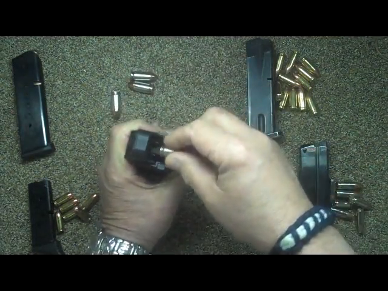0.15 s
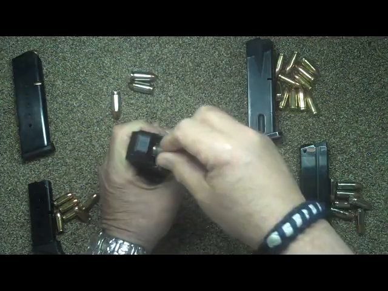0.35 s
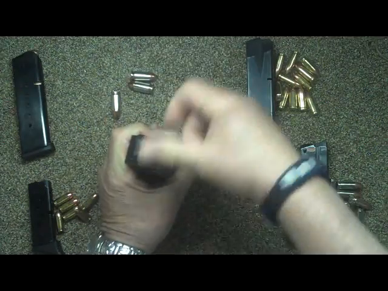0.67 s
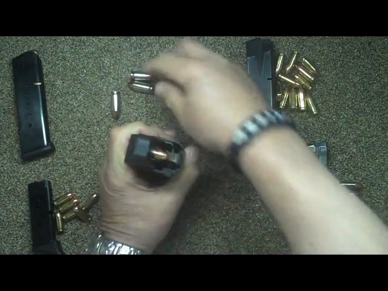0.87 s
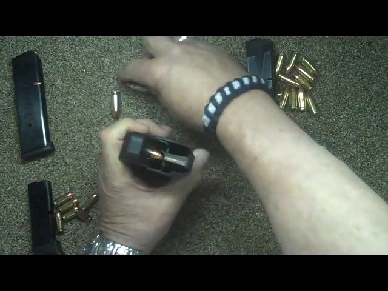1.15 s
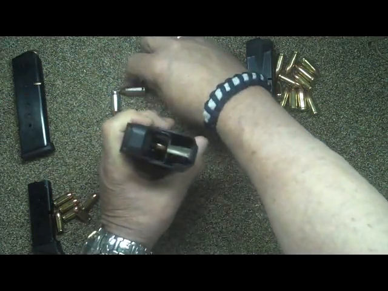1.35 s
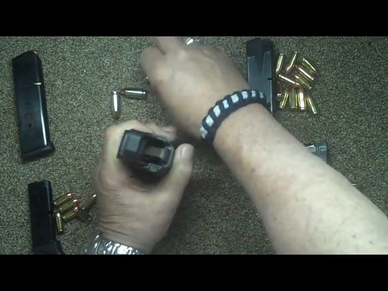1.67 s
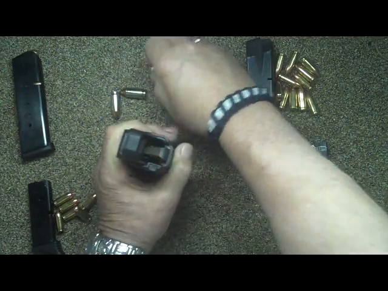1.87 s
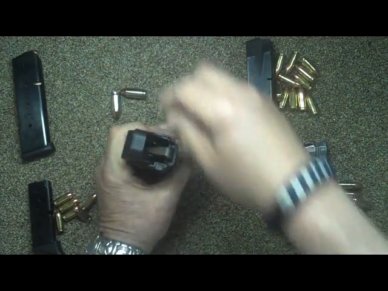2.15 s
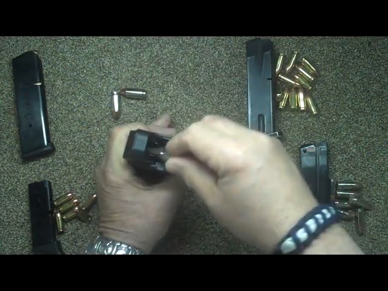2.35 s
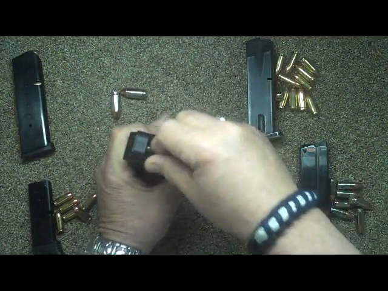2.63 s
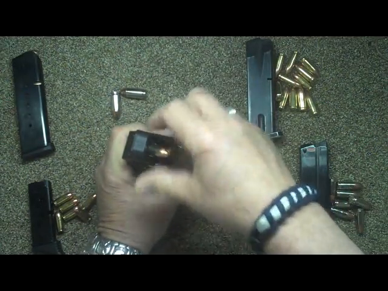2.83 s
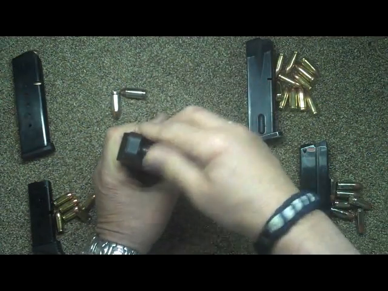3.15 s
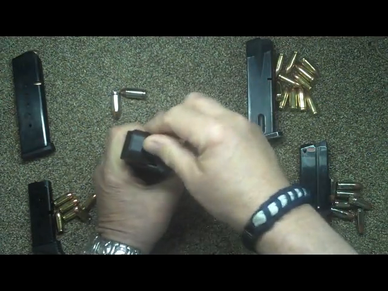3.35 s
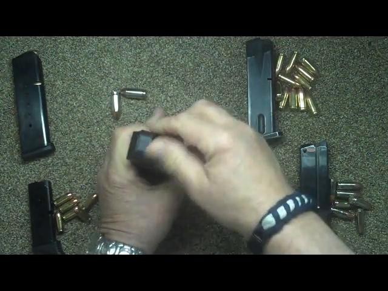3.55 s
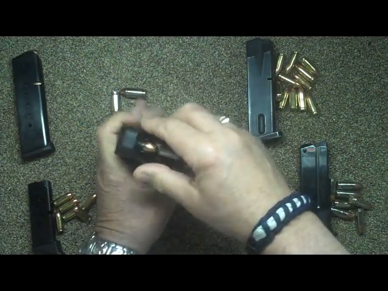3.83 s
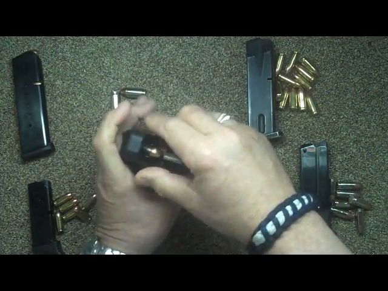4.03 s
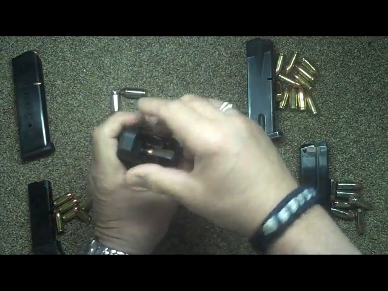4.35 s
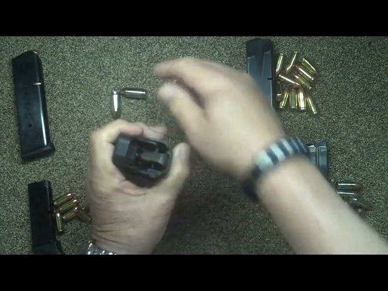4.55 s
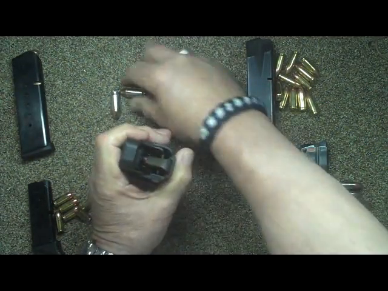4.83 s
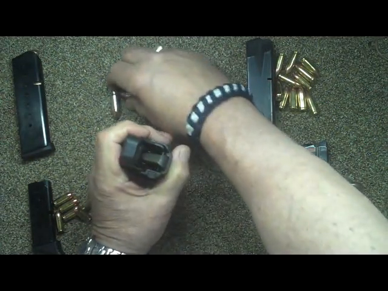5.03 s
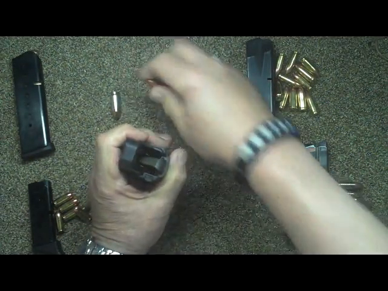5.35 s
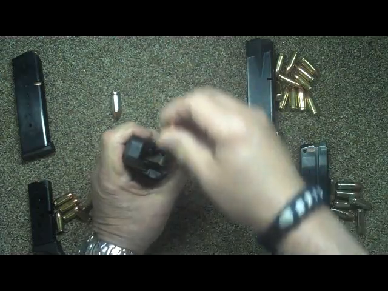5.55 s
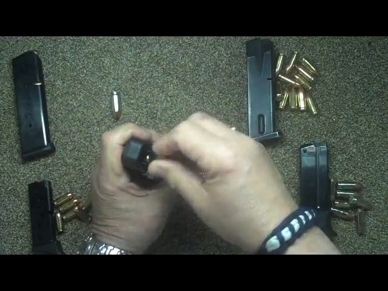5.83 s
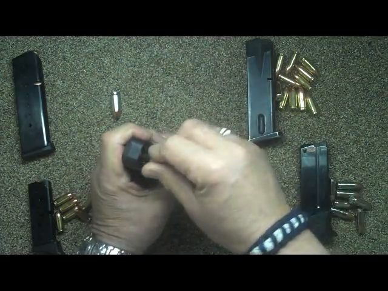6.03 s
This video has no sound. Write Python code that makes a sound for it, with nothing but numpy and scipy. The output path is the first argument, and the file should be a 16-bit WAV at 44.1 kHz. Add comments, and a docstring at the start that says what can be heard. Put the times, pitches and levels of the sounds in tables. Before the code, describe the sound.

Hands press cartridges one by one into a pistol magazine at a carpeted table. Sharp, dry clicks of plastic, steel and brass come in irregular clusters, with short gritty scrapes and faint finger rubbing between them. A scraping start leads to hard snaps, a busy middle burst, quieter handling, then more strong clicks. Close microphone, small soft room, steady low hiss.

```python
"""Sharp plastic and metal snaps, scrapes and soft rubbing, over steady hiss: hands press cartridges into
a pistol magazine with a plastic loader standing on a carpeted table, close to a microphone in a small room.
Each snap is a short chatter of tiny impacts that rings the base, loader, steel tube and brass.
Rubbing, scrapes and slides are gritty slips on the same parts; the spring is a dying sine.
Sparse echoes make the room and shaped noise makes the hiss."""
import sys
import numpy as np
from scipy import signal
from scipy.fft import rfft, irfft
from scipy.io import wavfile
from scipy.ndimage import uniform_filter1d

SR = 44100
rng = np.random.default_rng(int(sys.argv[2]) if len(sys.argv) > 2 else 0)


def master(y):
    """Save y as 16-bit WAV."""
    cut = np.clip(np.atleast_2d(y).T, -1, 1)
    pcm = np.round(cut * 32767)  # scale
    wavfile.write(sys.argv[1], SR, pcm.astype(np.int16))


N = 272979

# bounds between base, loader, tube and brass: f/Hz
PART_EDGES_HZ = [1400, 2600, 5500]
# dry rasp of skin and plastic between the rings: f/Hz, relative level per Hz/dB
RASP_SPECTRUM = [(100, 1.5), (400, -47.5), (1300, -5), (1800, 0), (3300, 4.5), (4000, -6), (5700, -1),
                 (8000, -4.5), (13500, -12)]
RASP_LUMP_DB = 2.5  # unevenness of the rasp
ANSWER_SIZE = 4096  # samples in the answer to one impact


def gain_of(db):
    """Decibels to gain."""
    return 10 ** (np.asarray(db) / 20)


def evened(x):
    """Scales each row to rms 1."""
    return x / np.sqrt(np.mean(x ** 2, -1, keepdims=True) + 1e-20)


def read(points, hz):
    """Reads a spectrum on a log-frequency axis."""
    f, value = np.transpose(points)
    return np.interp(np.log(hz + 1), np.log(f + 1), value)


def add(mix, s, sound):
    """Mixes a sound in at a time."""
    part = mix[round(s * SR):][:len(sound)]
    part += sound[:len(part)]


def coloured(x, points):
    """Shapes a signal by a spectrum."""
    hz = np.fft.rfftfreq(len(x), 1 / SR)
    return irfft(rfft(x) * gain_of(read(points, hz)), len(x))


def wander(size):
    """Slow random curve of rms 1: noise smoothed twice over size samples."""
    once = uniform_filter1d(rng.standard_normal(N), size)
    return evened(uniform_filter1d(once, size))


def grit(size, per_s, spread_db):
    """Tiny impacts at random times, of random sign and uneven size."""
    sizes = gain_of(spread_db * np.minimum(rng.exponential(1, size), 4))
    signs = rng.choice([-1., 1.], size)
    struck = rng.random(size) < per_s / SR
    return evened(sizes * signs * struck)


def knocks(colour, lump_db, size=ANSWER_SIZE):
    """Causal dry answer of each part: its share of a lumpy spectrum, with minimum phase."""
    hz = abs(np.fft.fftfreq(size, 1 / SR))
    inside = np.digitize(hz, PART_EDGES_HZ) == np.arange(4)[:, None]
    # many small, short rings above the base
    lumps = np.interp(hz, np.linspace(0, SR / 2, 160), rng.standard_normal(160))
    lumps_db = lump_db * (hz > PART_EDGES_HZ[0]) * lumps
    share = uniform_filter1d(inside * 1., size=60, mode="wrap") + 0.00054
    log_gain = np.log(gain_of(read(colour, hz) + lumps_db) * share)
    minimum_phase = np.exp(np.conj(signal.hilbert(log_gain)))
    return evened(np.fft.ifft(minimum_phase).real)


def parts(colour, dry_db, lump_db, spot_hz=2900.0, spot_db=-46.0, grip=0.0082, size=ANSWER_SIZE):
    """Answer of base, loader, tube and brass to one impact; the spot struck wakes the ring nearest spot_hz."""
    # what the parts ring with: f/Hz, width without the grip/Hz, level before scatter/dB
    ring_modes = [(300, 70, -9), (510, 50, -7), (590, 45, -2), (1075, 25, -11), (1200, 30, -12),
                  (1634, 30, -7), (1880, 32, -5), (2060, 38, -2), (2270, 50, -8), (2455, 35, -8),
                  (2740, 80, -8), (2950, 40, -9), (3130, 55, 0), (3290, 50, -5), (3700, 70, -8),
                  (4570, 40, -7), (4740, 40, -1), (5000, 90, -5), (5330, 70, -9), (5950, 80, -10),
                  (6770, 90, -9), (7160, 150, -10), (9140, 300, -18)]
    t = np.arange(size) / SR
    hz, width_hz, db = np.transpose(ring_modes)[..., None]
    width_hz = width_hz + grip * hz  # the gripping hand damps every ring, the high ones most
    scatter_db = 4 * rng.standard_normal(hz.shape)  # no two spots are alike
    rings = evened(np.exp(-np.pi * width_hz * t) * np.sin(2 * np.pi * hz * t))
    inside = np.digitize(hz[:, 0], PART_EDGES_HZ) == np.arange(4)[:, None]
    ringing = evened(inside @ (gain_of(db + scatter_db) * rings))
    dry = gain_of(dry_db - np.array([[8], [0], [0], [0]]))  # the hollow base rings more than it knocks
    woken = np.argmin(abs(hz - spot_hz))
    favoured = gain_of(spot_db) * inside[:, [woken]] * rings[woken]
    answer = ringing + dry * knocks(colour, lump_db) + favoured
    # only the base has a low voice
    high_pass = signal.butter(3, PART_EDGES_HZ[0], "high", fs=SR, output="sos")
    small = signal.sosfilt(high_pass, answer[1:])
    return evened(np.vstack([answer[:1], small]))


def shares(level_db, base_db, bright_db, spot_hz):
    """Gains of base, loader, tube and brass; brightness moves the sound from the loader to the brass."""
    tube_db, woken_db = 3.5, 4.5  # lift of the steel tube; lift of the part that holds the favoured ring
    woken = np.digitize(spot_hz, PART_EDGES_HZ) == np.arange(4)
    return gain_of(level_db + np.array([base_db, -bright_db, tube_db, bright_db]) + woken_db * woken)


def rubbing():
    """Dense slips under the moving hands ring the same parts; the contact drifts between four spots."""
    # light rubbing of the fingers: t/s, level before part shares/dB
    rub_levels = [(0, -37.5), (.22, -73.5), (.56, -52), (.72, -66), (1., -57), (1.38, -59.5), (1.55, -60.5),
                  (1.93, -65), (2.248, -52), (2.42, -63), (2.78, -58), (3.1, -63), (3.9, -58.5),
                  (4.24, -59.5), (4.37, -49.5), (4.52, -67), (4.95, -59.5), (5.5, -65), (5.702, -68),
                  (5.85, -58.5), (6.19, -56)]
    # base, loader, tube, brass: share/dB
    rub_shares_db = [-25, -9.5, -7, -11.5]
    dry_db = 14  # rasp over the rings
    weights = gain_of(np.interp(np.arange(N) / SR, *np.transpose(rub_levels)) + np.c_[rub_shares_db])
    drifts = gain_of([3.5 * wander(size=2500) for _ in range(4)])
    out = np.zeros(N)
    for drift in drifts / np.linalg.norm(drifts, axis=0):
        slips = np.array([grit(size=N, per_s=9000., spread_db=-3.0) * gain_of(4.8 * wander(size=1200))
                          for _ in weights])
        slips *= gain_of(1.75 * wander(size=400)) * drift  # flutter common to the parts
        answer = parts(RASP_SPECTRUM, dry_db, RASP_LUMP_DB)
        out += signal.oaconvolve(weights * slips, answer, axes=1)[:, :N].sum(0)
    return out / np.sqrt(ANSWER_SIZE)  # answers to unit energy


def scrape(length_s, level_db, base_db, bright_db, spot_hz, spot_db):
    """Gritty slips of part on part that bite, hold and let go."""
    attack_s, dry_db = 0.0056, 4  # dry: rasp over the rings
    release_db = 30  # lost in each further length of the scrape
    t = np.arange(16384) / SR
    overrun = np.maximum(t / max(length_s, .002) - 1, 0)
    hold = np.minimum(t / attack_s, 1) * gain_of(-release_db * overrun)
    flutter = gain_of(1.8 * wander(size=300)[:len(t)])
    slips = hold * grit(size=len(t), per_s=3000., spread_db=4.) * flutter
    impact = parts(RASP_SPECTRUM, dry_db, RASP_LUMP_DB, spot_hz, spot_db, grip=.018)
    answer = signal.fftconvolve(impact, slips[None], axes=1)
    return shares(level_db, base_db, bright_db, spot_hz) @ answer / np.sqrt(ANSWER_SIZE)


def hiss():
    """Steady microphone and room hiss: Gaussian noise shaped by a spectrum."""
    # f/Hz, relative level per Hz/dB
    hiss_spectrum = [(20, 12), (60, 9.5), (150, 5), (300, 3.5), (800, 2.5), (1500, -4), (3000, -22.5),
                     (5000, -30), (8000, -24), (14000, -18)]
    level_db = -69.5  # rms
    return gain_of(level_db) * evened(coloured(rng.standard_normal(N), hiss_spectrum))


def snap(strength_db, base_db, bright_db, spot_hz, length_s, drag):
    """A chatter of impacts rings all four parts: a clean blow decays at once, a dragged one swells, holds and breaks off."""
    # dry knock between the rings: f/Hz, relative level per Hz/dB
    knock_spectrum = [(60, -68), (150, -25), (400, 14.5), (900, 8.5), (1300, 4), (1800, 31), (3000, 33),
                      (5000, 24.5), (7500, 10), (10000, -1), (13500, -62)]
    dry_db, lump_db, spot_db = 6, 3, 5  # knock over rings; its unevenness; favoured ring over the others
    lead_db = 3.5  # first impact of a clean blow, against the chatter
    t = np.arange(4096) / SR
    length_s, drag = max(length_s, .001), max(drag, .7)
    swell_s = 0.0018 + 0.0021 * length_s * drag ** 2
    blow = (1 - np.exp(-t / swell_s)) * np.exp(-(t / length_s) ** drag)
    chatter = blow * grit(size=len(t), per_s=9900.0, spread_db=2.5)
    chatter[20] += gain_of(lead_db) / drag ** 2
    impact = parts(knock_spectrum, dry_db, lump_db, spot_hz, spot_db, grip=.019)
    answer = signal.fftconvolve(impact, chatter[None], axes=1)
    # loudest 200 samples of each part to rms 1
    answer /= np.sqrt(abs(uniform_filter1d(answer ** 2, 200))).max(1, keepdims=True)
    return shares(strength_db, base_db, bright_db, spot_hz) @ answer


def spring(level_db):
    """The magazine spring hums on after a jolt: a thin dying sine, cut at 0.5 s."""
    hum_hz, t60_s = 520, .55
    t = np.arange(SR // 2) / SR
    return gain_of(level_db - 60 * t / t60_s) * np.sin(2 * np.pi * hum_hz * t)


def slide(path):
    """Slips pass a travelling band, which wakes one ring after another; returns start/s and sound."""
    contact_width_hz = 200.  # how many rings the contact reaches at once
    s, db, hz = np.transpose(path)
    t = np.arange(s[0], s[-1], 1 / SR)
    slips = grit(size=len(t), per_s=13000.0, spread_db=-0.5)
    # band-pass: shifted down to zero, smoothed, shifted back
    turn = np.exp(2j * np.pi * np.cumsum(np.interp(t, s, hz)) / SR)
    keep = np.exp(-np.pi * contact_width_hz / SR)
    contact = turn * signal.lfilter([1], [1, -2 * keep, keep ** 2], slips / turn)
    impact = parts(RASP_SPECTRUM, -15.0, RASP_LUMP_DB, grip=.006).sum(0)
    ringing = signal.fftconvolve(contact.real, impact)[:len(t)]
    local_rms = np.sqrt(uniform_filter1d(ringing ** 2, size=1500) + 1e-20)
    return s[0], gain_of(np.interp(t, s, db)) * ringing / local_rms


def room(x):
    """Sparse echoes of random sign that die quickly in a soft room."""
    t60_s = 0.085
    at = np.arange(150, 9000, 20)
    taps = np.zeros(9100)
    signs = rng.choice([-1., 1.], len(at))
    taps[at + rng.integers(0, 20, len(at))] = signs * gain_of(-60 * at / SR / t60_s)
    taps = signal.lfilter([1], [1, -.4], taps)  # gently softer treble
    return signal.oaconvolve(x, taps / np.linalg.norm(taps))[:N]


def scene():
    """Rubbing, scrapes, snaps, spring and slides in the room, over the hiss."""
    # part on part: start/s, length/s, level before part shares/dB, base share/dB, brightness/dB,
    # favoured ring f/Hz, its level over the other rings/dB
    scrape_events = [(0, 0.12, -52.5, 0.5, -4, 3130, 18), (0.025, 0.028, -49, -6.5, 1.5, 590, 28),
                     (0.085, 0.014, -49, -6, 2, 525, 20), (0.418, 0.056, -75.5, -14, 11, 7160, 0),
                     (0.66, 0.014, -65.5, 2, 3, 2060, 12), (0.778, 0.019, -66.5, 5, -5, 1634, 12),
                     (0.838, 0.055, -62.5, 0.5, -2, 1634, 6), (0.912, 0.091, -60.5, -24, -2, 1634, -4),
                     (1.273, 0.024, -46.5, -9, -5.5, 2060, 13), (1.599, 0.084, -57, -11.5, 1, 2060, -5),
                     (1.994, 0.065, -54.5, 3, -0.5, 3130, 9), (2.084, 0.042, -58.5, 5.5, -8.5, 525, 22),
                     (2.105, 0.079, -63, 7, -2, 2060, 12), (2.194, 0.056, -64, 5, -6, 1634, 24),
                     (2.664, 0.034, -56, -7, 1, 1880, 11), (2.918, 0.0108, -53, -20, -17, 1634, 25),
                     (3.032, 0.0087, -64, -20, -11.5, 1634, 21), (3.064, 0.011, -77.5, -20, 14.5, 9140, 6),
                     (3.329, 0.063, -62.5, 5, -0.5, 1634, 4), (3.519, 0.029, -64, -3.5, -2.5, 2060, -4),
                     (3.609, 0.042, -73, -2, 11.5, 3130, 14), (3.694, 0.018, -72, 11, -8, 2060, -4),
                     (3.802, 0.038, -51.5, -33, 0, 4570, -26), (5.246, 0.047, -50.5, -1.5, 0, 300, 0.5),
                     (5.414, 0.026, -54, 7.5, 10, 590, 15), (5.918, 0.033, -45, -31, -2.5, 1880, 10),
                     (6.017, 0.013, -58.5, -5, 0, 1880, 8)]
    # t/s, strength before part shares/dB, base share/dB, brightness/dB, favoured ring f/Hz,
    # chatter length/s, drag (1 blow - 4 scrape)
    snap_events = [(0.019, -62, -10, 7, 3140, 0.018, 3.6), (0.102, -45, -33, 1.5, 3140, 0.021, 1.14),
                   (0.122, -45.5, -5, 2.5, 7160, 0.019, 4), (0.247, -41, -11.5, 3, 5060, 0.0087, 0.82),
                   (0.3045, -54, -4, 5.5, 2835, 0.014, 1.3), (0.335, -54, -3, -2.5, 2060, 0.019, 6.3),
                   (0.46, -55.5, -10, -4, 1634, 0.015, 0.94), (0.503, -50, -9, 6, 3140, 0.012, 4.4),
                   (0.529, -65.5, 7, 1, 1090, 0.095, 0.99), (0.594, -53, -7, -2.5, 1880, 0.0024, 2.6),
                   (0.61, -41.5, -14, 3.7, 2060, 0.012, 3.9), (0.817, -50.5, -2.5, -3, 3140, 0.014, 2),
                   (0.9505, -48.5, -16, -2.5, 3325, 0.012, 1.05), (1.07, -54.5, -4, -3, 2060, 0.013, 1.8),
                   (1.188, -58.5, -31, -8.5, 2060, 0.0067, 0.56), (1.2323, -47, -40, 1, 7160, 0.02, 0.76),
                   (1.262, -34, -23.5, 5, 2060, 0.0048, 3.9), (1.2669, -37, -44, -4.5, 3290, 0.0056, 0.71),
                   (1.311, -59.5, -30, 16, 6770, 0.001, 1.5), (1.317, -50.5, -25, -0.5, 7160, 0.0089, 0.93),
                   (1.5282, -52.5, -17, -6.5, 3140, 0.021, 12), (1.555, -54.5, -6, -6.5, 3140, 0.014, 1.5),
                   (1.6893, -43.5, -12, 7, 9140, 0.006, 1.6), (1.821, -64, 0.5, -12, 3140, 0.0081, 1.8),
                   (2.0205, -45, -1, 4.5, 3140, 0.03, 1.03), (2.087, -46, 2.5, 4.5, 1634, 0.02, 1.6),
                   (2.187, -43, -2, 2, 6770, 0.014, 1.2), (2.424, -50, -6.5, 0, 3140, 0.02, 0.61),
                   (2.4768, -34, -27, -5, 3140, 0.0036, 1.1), (2.4828, -39.5, -45, -11.5, 2950, 0.0019, 1),
                   (2.5079, -39.5, -8, 0, 3140, 0.013, 1.8), (2.5247, -37, -16, 7, 5060, 0.0048, 1.15),
                   (2.5458, -43, -12, 3, 5060, 0.0047, 0.76), (2.602, -53, -23, -5, 2060, 0.034, 9.7),
                   (2.627, -55.5, -8, 10.5, 2060, 0.014, 1.8), (2.685, -39, -8, 2, 5060, 0.0061, 0.95),
                   (2.7239, -36.5, -14, 1.5, 3700, 0.0078, 0.94), (2.894, -56, -5, 3.5, 2060, 0.015, 1.1),
                   (3.4224, -37.5, -7.5, -1, 4740, 0.0081, 1.13),
                   (3.7506, -58.5, -5, 0.5, 4570, 0.094, 0.54), (3.773, -48.5, -14, -2, 2950, 0.016, 2.5),
                   (3.954, -47, -8.5, -1.5, 2060, 0.0067, 1.7), (4.124, -53.5, -44, 8, 4740, 0.0042, 0.61),
                   (4.738, -47.5, -15, -4.5, 2740, 0.011, 5), (4.861, -54.5, -8, 1.5, 3325, 0.022, 0.81),
                   (4.8936, -43.5, -2.5, 1.5, 2455, 0.0077, 3.2), (5.107, -60, 6, -1, 510, 0.0072, 1.6),
                   (5.306, -42.5, 5, -3.5, 4740, 0.016, 6.1), (5.412, -36.5, -3.5, 2, 4740, 0.035, 2.7),
                   (5.4386, -47, 3, -4.5, 3140, 0.014, 0.72), (5.759, -41.5, -4.5, -1, 3325, 0.0093, 0.53),
                   (5.7646, -32.5, -47, 0.5, 4740, 0.017, 8.1), (5.952, -40.5, -9, -3.5, 1880, 0.014, 3.1),
                   (6.073, -50.5, -5.5, 0.7, 3140, 0.019, 0.59), (6.1317, -35, -6, 0, 1880, 0.0097, 3.4)]
    # spring hums: t/s, starting level/dB
    spring_events = [(.12, -66), (2.19, -66)]
    # long slides of part on part, one path each: t/s, level/dB, contact f/Hz
    slide_paths = [
        [(3.795, -62, 2050), (3.812, -46, 2200), (3.84, -43, 2700), (3.852, -60, 2700)],
        [(4.14, -70, 2080), (4.22, -64, 2060), (4.29, -63, 2020), (4.35, -61, 1850), (4.42, -62, 1760),
         (4.49, -67, 1634), (4.52, -80, 1634)],
    ]
    hands = rubbing()
    for s, *row in scrape_events:
        add(hands, s, scrape(*row))
    for s, *row in snap_events:
        add(hands, s, snap(*row))
    for s, level_db in spring_events:
        add(hands, s, spring(level_db))
    for path in slide_paths:
        add(hands, *slide(path))
    # little deep bass, soft top
    band = signal.butter(3, [130., 13000.], "band", fs=SR, output="sos")
    hands = signal.sosfilt(band, hands)
    return (hands + gain_of(-13.0) * room(hands) + hiss())[None]


def record(dry):
    """Low-pass band limit and a small constant offset."""
    edge_hz, offset = 14100, -.0005
    low_pass = signal.firwin(511, edge_hz, window=("kaiser", 9), fs=SR)
    return signal.oaconvolve(dry, low_pass[None], "same") + offset


dry = scene()
out = record(dry)
master(out)
```